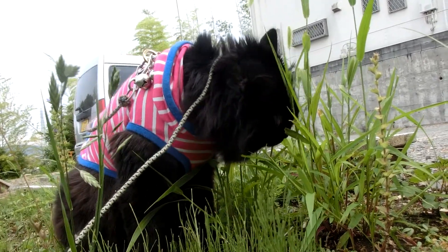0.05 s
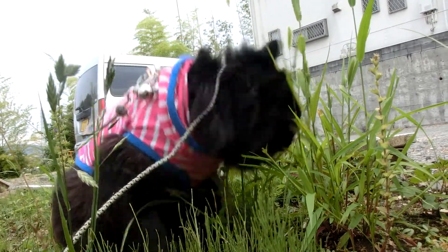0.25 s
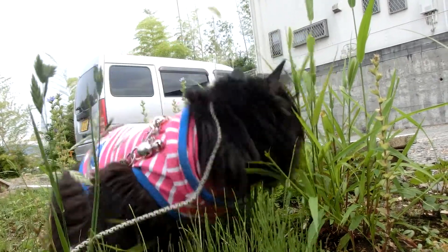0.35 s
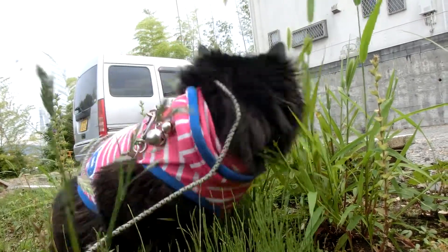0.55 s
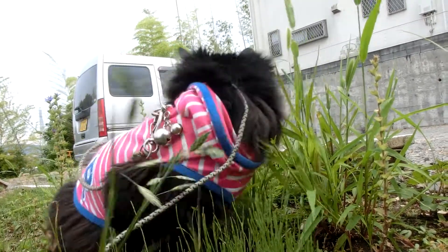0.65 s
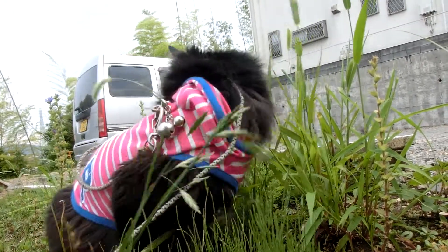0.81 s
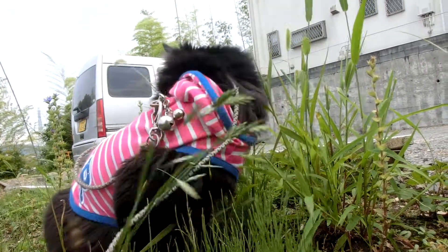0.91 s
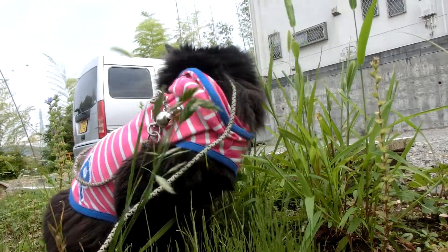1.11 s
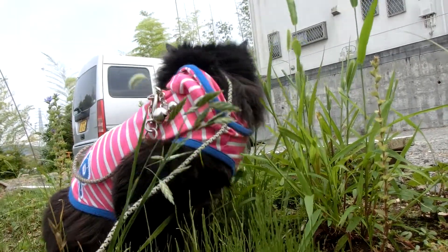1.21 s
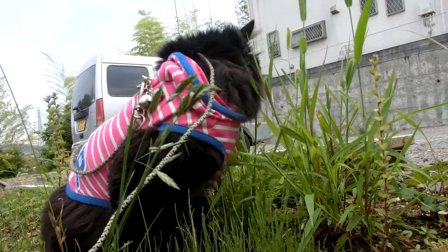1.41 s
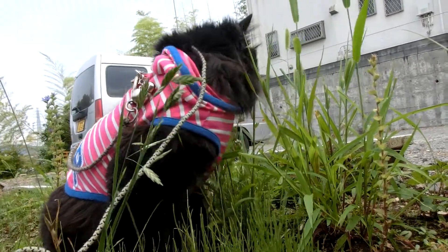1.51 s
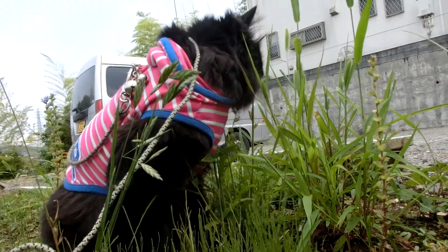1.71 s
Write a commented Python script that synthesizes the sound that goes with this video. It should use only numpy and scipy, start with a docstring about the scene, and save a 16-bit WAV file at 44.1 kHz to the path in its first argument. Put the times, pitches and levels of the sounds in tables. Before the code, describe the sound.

Small bells on a cat's harness jingle close by in uneven, light rattles from about 0.3 to 0.9 seconds. Just before, at 0.2 seconds, a leash clasp clinks and cloth and grass begin rustling softly, easing after 0.7. Small birds chirp faintly further off between 0.3 and 0.7 seconds, and more weakly around 1.5. A very quiet outdoor hiss and low rumble lie underneath.

```python
"""Outdoors in the grass, a cat in a cloth harness turns close by. Pellets strike the shells of its small
bells, and each impact excites a short hoot of the cavity resonance under thin rings of the metal.
The leash clasp clinks, the harness knocks, and friction makes cloth and grass rustle. Further off,
small birds chirp with both sides of the syrinx over a quiet murmur and hiss."""
import sys
import numpy as np
from scipy import signal
from scipy.fft import rfft, irfft
from scipy.io import wavfile
from scipy.ndimage import uniform_filter1d

SR = 44100
rng = np.random.default_rng(int(sys.argv[2]) if len(sys.argv) > 2 else 0)


def master(y):
    """Save y as 16-bit WAV."""
    cut = np.clip(np.atleast_2d(y).T, -1, 1)
    pcm = np.round(cut * 32767)  # scale
    wavfile.write(sys.argv[1], SR, pcm.astype(np.int16))


N = 77175


def undb(db):
    """Amplitude ratio of a level in decibels."""
    return 10 ** (np.asarray(db) / 20)


def unit(x):
    """Normalisation to an rms of one."""
    return x / np.sqrt(np.mean(x ** 2))


def colour(x, points):
    """Spectral shaping by a curve of (Hz, dB) points."""
    hz, db = np.array(points).T
    f = np.maximum(np.fft.rfftfreq(N, 1 / SR), 1)
    return irfft(rfft(x) * undb(np.interp(np.log(f), np.log(hz), db)), N)


def wander(rate_hz):
    """Random fluctuation: smoothed noise with an rms of one."""
    width = int(SR / rate_hz)
    return unit(uniform_filter1d(uniform_filter1d(rng.standard_normal(N), width), width))


def since(start):
    """Elapsed time in seconds, zero before the start."""
    return np.maximum(np.arange(N) / SR - start, 0)


def decay(start, t60):
    """Exponential damping: a sudden onset, then a fall of 60 dB in t60 seconds."""
    age = since(start)
    return (age > 0) * np.exp(-np.log(1000) * age / t60)


def swells(table):
    """A sum of Gaussian envelopes, one for each row."""
    return sum(undb(db) * np.exp(-((since(0) - when) / half) ** 2) for when, half, db in table)


def ring(start, modes, detune, attack_s=.0001):
    """Free vibration in damped modes; each blow varies their strength, sign and tuning."""
    age, out = since(start), 0
    for (hz, db, t60), (extra_db, shift, sign) in zip(modes, rng.standard_normal((len(modes), 3))):
        wave = np.sign(sign) * np.sin(2 * np.pi * hz * (1 + detune * shift) * age)
        out = out + undb(db + extra_db) * wave * decay(start, t60)
    return out * np.minimum(age / attack_s, 1)


def crack(start, t60, low_hz, top_hz=14800):
    """Contact noise: a brief impact spreads its energy over a wide band."""
    burst = rng.standard_normal(N) * decay(start, t60)
    burst = signal.sosfilt(signal.butter(6, top_hz, fs=SR, output="sos"), burst)
    return signal.sosfilt(signal.butter(1, low_hz, "high", fs=SR, output="sos"), burst)


def pan(db):
    """Direction by level difference: two gains, the left db above the right."""
    return undb(np.array([[db], [-db]]) / 2)


def place(x, pan_db, echo_db, t60):
    """Scattering from ground, plants and walls adds a diffuse tail to the panned direct sound."""
    tail = rng.standard_normal((2, N)) * decay(0.0011, t60)
    tail /= np.sqrt(np.sum(tail ** 2, axis=1, keepdims=True))
    scatter = signal.fftconvolve(np.atleast_2d(x), tail, axes=1)[:, :N]
    return x * pan(pan_db) + undb(echo_db) * scatter


# Background spectrum. Each row: frequency in Hz, relative spectral density in dB.
AIR_SPECTRUM = [(12, -67), (20, 2), (49, -7.5), (83, -2.5), (185, -3.5), (306, -8), (333, -9.5),
                (452, -10.5), (565, -11.5), (906, -8.5), (985, -13.5), (2540, -19.5), (4070, -24),
                (8640, -24.5), (15500, -30.5)]
# Its stereo width. Each row: frequency in Hz, side minus mid level in dB.
AIR_SIDE = [(30, -4), (80, -5.5), (150, -17), (300, -3.5), (1000, -5.5), (4000, 0), (14000, 0.5)]


def air():
    """Ambient noise: a distant low murmur and smooth hiss, partly correlated between the ears."""
    mid, side = (unit(colour(rng.standard_normal(N), AIR_SPECTRUM)) for _ in range(2))
    return undb(-62) * (mid + colour(side, AIR_SIDE) * np.array([[1], [-1]]))


def rasp(width_hz=570):
    """Random modulation: a fast flutter that spreads a whistle into a hoarse band."""
    lowpass = signal.butter(2, width_hz, fs=SR, output="sos")
    noise = signal.sosfilt(lowpass, rng.standard_normal((2, N)))
    return (unit(noise[0]) + 1j * unit(noise[1])) / np.sqrt(2)


# Contours, one list per chirp. Each row: time in seconds, pitch of the lower voice in Hz,
# relative levels of the lower and the upper voice in dB.
CHIRP_CONTOURS = [
    [(-.02, 3750, -57, -75), (.005, 4186, -50.5, -53), (.014, 4830, -50, -64), (.023, 4220, -61, -50.5),
     (.042, 4740, -57, -73)],
    [(.318, 3900, -35, -57), (.33, 3630, -42.5, -43), (.342, 3594, -45.5, -50), (.353, 4106, -40, -30.5),
     (.362, 4210, -46, -42), (.372, 4690, -29.5, -47.5), (.383, 4200, -47.5, -75)],
    [(.449, 4530, -43.5, -65), (.462, 4465, -40, -81), (.484, 4010, -45.5, -47), (.5, 4400, -38.5, -47.5),
     (.509, 4800, -40.5, -69), (.517, 4300, -48, -68)],
    [(.62, 3600, -50, -44), (.645, 3944, -42.5, -53), (.652, 3740, -45, -60), (.661, 4080, -39, -73),
     (.666, 4193, -52, -65), (.673, 4323, -40.5, -79), (.683, 4374, -42, -80), (.692, 4030, -55, -89)],
    [(1.395, 4450, -67, -84), (1.415, 4140, -58, -74), (1.436, 4425, -51, -75), (1.458, 4776, -55, -75),
     (1.47, 4630, -47.5, -62), (1.48, 4320, -70, -64)],
    [(1.54, 3804, -70, -83), (1.568, 3790, -59, -61), (1.585, 3823, -62.5, -57.5), (1.602, 4080, -64, -55),
     (1.62, 4130, -66, -65)],
]
# Hoarseness. Each entry: the noisy share of one chirp's power, from 0 to 1.
HOARSE_SHARES = [.35, .08, .08, .14, .4, .25]
UPPER_VOICE_RATIO, CHIRP_FADE_S, WARBLE_DEPTH = 1.215, 0.0073, 0.00906
SUM_TONE_DB, OCTAVE_DB = -14.5, -26.5
WALL_DELAY_S, WALL_ECHO_DB = .048, -17


def birds():
    """Nonlinear mixing: whistles from the two sides of the syrinx form overtones; a wall echoes them."""
    t, out = since(0), 0
    for chirp, hoarse in zip(CHIRP_CONTOURS, HOARSE_SHARES):
        when, hz, lower_db, upper_db = np.array(chirp).T
        gate = np.clip(1 + np.minimum(t - when[0], when[-1] - t) / CHIRP_FADE_S, 0, 1)
        voices = []
        for ratio, db in ((1, lower_db), (UPPER_VOICE_RATIO, upper_db)):
            pitch = ratio * np.interp(t, when, hz) * (1 + WARBLE_DEPTH * wander(445))
            whistle = np.exp(2j * np.pi * np.cumsum(pitch) / SR)
            flutter = np.sqrt(1 - hoarse) + np.sqrt(hoarse) * rasp()
            voices.append(gate * undb(np.interp(t, when, db)) * whistle * flutter)
        lower, upper = voices
        sum_tone = lower * upper / np.sqrt(np.abs(lower * upper) + 1e-18)
        octave = lower * np.exp(1j * np.angle(lower))
        out = out + np.imag(lower + upper + undb(SUM_TONE_DB) * sum_tone + undb(OCTAVE_DB) * octave)
    echo = np.pad(out, (round(WALL_DELAY_S * SR), 0))[:N]
    return undb(0.5) * (out + undb(WALL_ECHO_DB) * echo)


# Strokes of fur on cloth. Each row: peak time in seconds, half length in seconds, level in dB.
BRUSH_STROKES = [(0.136, 0.046, -61), (0.225, 0.033, -59.5), (0.32, 0.02, -70), (0.36, 0.02, -59)]
# Their spectrum. Each row: frequency in Hz, relative spectral density in dB.
BRUSH_SPECTRUM = [(100, -11), (350, -11), (850, 4.5), (1500, -0.5), (3000, 0.5), (6000, -6.5), (15000, -41)]


def brushes():
    """Sliding friction: fur and cloth give soft swells of noise as the cat starts to turn."""
    return swells(BRUSH_STROKES) * unit(colour(rng.standard_normal(N), BRUSH_SPECTRUM))


# The cat's movement. Each row: time in seconds, relative rustle level in dB.
RUSTLE_LEVELS = [(0, -67.5), (.17, -66.5), (.23, -52.5), (.31, -49), (.39, -54), (.445, -55), (.5, -55),
                 (.6, -53.5), (.69, -63), (.86, -61), (.95, -66), (1.18, -68), (1.245, -61), (1.3, -66.5),
                 (1.46, -64), (1.58, -62), (1.75, -76)]
# Spectrum of the rustle. Each row: frequency in Hz, relative spectral density in dB.
RUSTLE_SPECTRUM = [(100, -2.5), (400, -4.5), (900, -3.5), (2000, -4.5), (5000, -2), (8000, -4), (12000, 1),
                   (14500, -3), (16000, -3)]
GRAINS_PER_S, GRAIN_SPREAD_DB, RUSTLE_SIDE_DB = 5000, 2, -3


def rustle():
    """Shot noise: cloth, fur and grass crackle in tiny random impulses as the cat moves."""
    def grains():
        sizes = undb(GRAIN_SPREAD_DB * np.minimum(rng.exponential(size=N), 5)) * rng.standard_normal(N)
        occurs = rng.random(N) < GRAINS_PER_S / SR
        return unit(colour(sizes * occurs, RUSTLE_SPECTRUM))
    level = undb(np.interp(since(0), *np.array(RUSTLE_LEVELS).T) + 0.99 * wander(73))
    return level * (grains() + undb(RUSTLE_SIDE_DB) * grains() * np.array([[1], [-1]]))


# Slaps of the straps. Each row: start in seconds, level in dB, centre frequency in Hz.
STRAP_KNOCKS = [(0.303, -41, 5570), (0.313, -41.5, 5900), (0.388, -52.5, 764), (0.534, -54, 1000)]


def knocks():
    """Heavily damped impacts: leash and harness slap the body in noise bursts an octave wide."""
    out = 0
    for start, db, hz in STRAP_KNOCKS:
        band = signal.butter(2, hz * np.array([2 ** -.5, 2 ** .5]), "band", fs=SR, output="sos")
        noise = unit(signal.sosfilt(band, rng.standard_normal(N)))
        out = out + undb(db) * noise * decay(start, t60=0.038)
    return out


# Blows of clasp on ring. Each row: start in seconds, clasp and ring gains in dB, favoured mode in Hz.
CLASP_BLOWS = [(.191, -44.5, -64, 11300), (.2015, -42, -44, 12800), (0.2424, -28, -45.5, 13380),
               (.2685, -29.5, -61, 13120), (.2762, -41, -51, 11200), (.2935, -37.5, -62, 11170),
               (.3035, -30.5, -59, 13980)]
# Modes of the clasp and of the harness ring. Each row: frequency in Hz, gain in dB, t60 in seconds.
CLASP_MODES = [(11170, 0, 0.035), (12780, -1, 0.022), (13120, 0, 0.025), (13380, 0, 0.022),
               (13980, -2, .035)]
HARNESS_MODES = [(6444, -9, 0.13), (11980, 0, 0.13)]
OTHER_MODES_DB, FAVOUR_WIDTH_HZ = -14, 370


def clasp():
    """Modal excitation: the leash clasp hits the harness ring, and the spot struck favours one mode."""
    out = 0
    for start, clasp_db, ring_db, favoured_hz in CLASP_BLOWS:
        modes = [(hz, db + OTHER_MODES_DB * min(abs(hz - favoured_hz) / FAVOUR_WIDTH_HZ, 1), t60)
                 for hz, db, t60 in CLASP_MODES]
        clink = ring(start, modes, detune=0.0024) + undb(-3) * crack(start, t60=0.013, low_hz=9400)
        out = out + undb(clasp_db) * clink + undb(ring_db) * ring(start, HARNESS_MODES, detune=0.0017)
    return out


# Touches of metal. Each row: start in seconds, gain in dB.
METAL_TICKS = [(0.444, -36), (0.832, -45), (0.8364, -46), (0.845, -44), (1.121, -50)]


def ticks():
    """Light impacts: small metal parts touch and give only bright contact noise."""
    return sum(undb(db) * crack(start, t60=0.025, low_hz=11400) for start, db in METAL_TICKS)


# Rolls of a pellet. Each row: peak time in seconds, half length in seconds, level in dB.
PELLET_ROLLS = [(0.268, 0.014, -51.5), (0.514, 0.014, -51), (0.56, 0.012, -46.5)]
# Their spectrum. Each row: frequency in Hz, relative spectral density in dB.
ROLL_SPECTRUM = [(2300, -46), (3000, -14), (3300, -2), (3450, -3), (3700, -9), (4600, -34)]


def rolls():
    """Noise-driven resonance: a pellet rolls round its shell and keeps the cavity whirring."""
    return swells(PELLET_ROLLS) * unit(colour(rng.standard_normal(N), ROLL_SPECTRUM))


def hoot(start, hz, rise_s, sharpness=1.93):
    """Cavity resonance: the air in a bell swells for a few cycles and dies quickly."""
    age = since(start)
    progress = age / rise_s
    return (progress * np.exp(1 - progress)) ** sharpness * np.sin(2 * np.pi * hz * age)


# Pellet strikes. Each row: time in seconds, cavity gain in dB, cavity pitch in Hz, low and high shell
# gains in dB, left minus right level of the high ring in dB, cavity rise in seconds, contact gain in dB.
PELLET_STRIKES = [(0.275, -25.5, 3304, -42.5, -39, -7, 0.0025, -66),
                  (0.2871, -32, 3250, -52, -54, -3, 0.0016, -70),
                  (0.2922, -35, 3250, -64, -45, -8, 0.0017, -71),
                  (0.2953, -31, 3420, -60, -39, -9, 0.0013, -58),
                  (0.309, -24.5, 3150, -55, -29.5, 3, 0.0027, -47.5),
                  (0.3183, -31, 3260, -69, -36, -17, 0.002, -60),
                  (0.3451, -30.5, 3276, -49, -37.5, -9, 0.0026, -58),
                  (0.3525, -31, 3260, -47.5, -53, -0.5, 0.0019, -52),
                  (0.359, -39, 3210, -59, -41, -3, 0.0034, -57),
                  (0.4067, -26, 3282, -46.5, -37, 7, 0.0022, -52.5),
                  (0.4161, -28, 3400, -53, -54, -12, 0.00063, -62),
                  (0.5338, -21.5, 3280, -44, -35, 4, 0.0019, -51),
                  (0.5382, -50, 3140, -63, -27, -1, 0.0021, -55),
                  (0.543, -42, 3214, -59, -46, 2, 0.0047, -70),
                  (0.574, -29.5, 3250, -49, -57, -3, 0.0016, -54),
                  (0.5816, -30.5, 3240, -46, -29.5, 0, 0.0019, -56),
                  (0.5879, -26, 3236, -56, -55, 3, 0.0016, -61),
                  (0.5922, -41, 3150, -61, -41, 3, 0.0013, -59),
                  (0.6047, -30.5, 3400, -64, -62, 0, 0.001, -90),
                  (0.611, -36, 3230, -51, -62, 2, 0.0018, -60),
                  (0.6172, -25.5, 3330, -56, -49, 7, 0.0016, -58),
                  (0.6261, -26, 3250, -44, -39, 9, 0.0015, -53.5),
                  (0.6311, -29.5, 3390, -63, -52, 2, 0.002, -55),
                  (0.6626, -28.5, 3356, -51.5, -41.5, 4, 0.0015, -59),
                  (0.706, -37, 3450, -78, -76, -5, 0.00093, -69),
                  (0.713, -43, 3570, -82, -71, 1, 0.0011, -74),
                  (0.7434, -26, 3280, -43.5, -53, 5, 0.0014, -50),
                  (0.8568, -30, 3353, -56, -45, 10, 0.0017, -59.5),
                  (0.8668, -37, 3420, -70, -56, 1.5, 0.0011, -72)]
# Modes of a bell's cavity and shell. Each row: frequency in Hz, gain in dB, t60 in seconds.
CAVITY_MODES = [(3020, -31, .05), (3150, -25, .065), (3295, -24, .06), (3400, -26, .05), (3740, -30, .05)]
LOW_SHELL_MODES = [(7770, -1.5, 0.062), (7840, -5, 0.039), (8100, -3, 0.05)]
HIGH_SHELL_MODES = [(14030, -9, .035), (14400, -16, .03), (14490, -0.5, 0.035), (14510, -11, 0.035)]
ONSET_DELAY_S, CAVITY_BOOST_DB, CONTACT_BOOST_DB = 0.000379, 1, 7.5
BOUNCE_S, BOUNCE_DB = 0.0038, -8.5


def bells():
    """Impact excitation: a pellet cracks against the bell, sounds cavity and shell, and bounces once."""
    out = 0
    chances = rng.uniform(-0.99, 1, (len(PELLET_STRIKES), 2))
    for strike, (lag, shift) in zip(PELLET_STRIKES, chances):
        when, cavity_db, hz, low_db, high_db, pan_db, rise_s, contact_db = strike
        start = when + ONSET_DELAY_S
        bounce = hoot(start + BOUNCE_S * (1 + 0.147 * lag), hz * (1 + .03 * shift), rise_s)
        after_ring = ring(start + BOUNCE_S, CAVITY_MODES, detune=0.0038)
        cavity = hoot(start, hz, rise_s) + undb(BOUNCE_DB) * bounce + after_ring
        low = undb(low_db) * ring(start, LOW_SHELL_MODES, detune=0.0077)
        # Directivity: a turning bell beams its high ring to either side.
        high = undb(high_db) * pan(pan_db) * ring(start, HIGH_SHELL_MODES, detune=0.0017)
        contact = undb(contact_db + CONTACT_BOOST_DB) * crack(start, t60=0.037, low_hz=1030)
        out = out + undb(cavity_db + CAVITY_BOOST_DB) * cavity + low + high + contact
    return out


def scene():
    """Superposition of the cat close by, the birds further off and the background all around."""
    jingle = place(bells() + ticks() + rolls(), pan_db=-2.2, echo_db=-13, t60=0.06)
    clinks = place(clasp(), pan_db=1.5, echo_db=-4, t60=0.031)
    movement = rustle() + brushes() + knocks()
    chirps = place(birds(), pan_db=2, echo_db=-7.5, t60=0.41)
    return jingle + clinks + movement + chirps + air()


def record(dry):
    """Band limiting: a steep low-pass filter cuts the treble above 15650 Hz."""
    return signal.sosfilt(signal.ellip(10, .2, 70, 15650, fs=SR, output="sos"), dry)


dry = scene()
out = record(dry)
master(out)
```